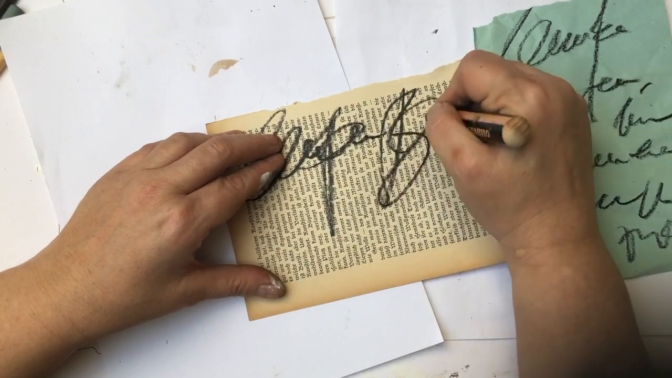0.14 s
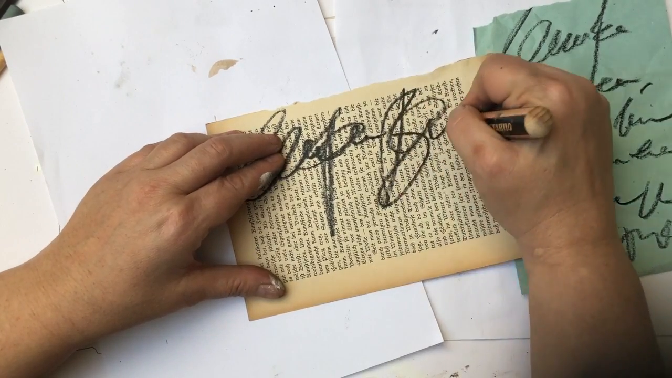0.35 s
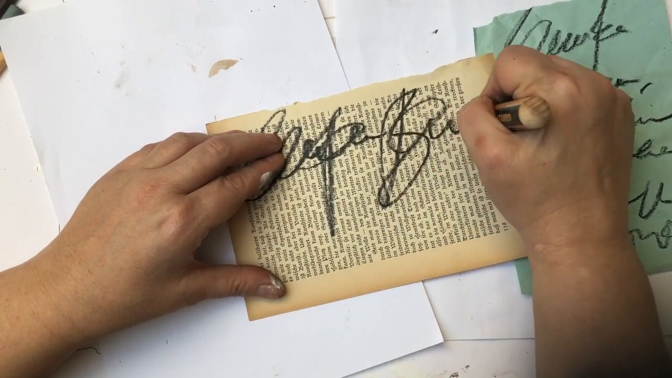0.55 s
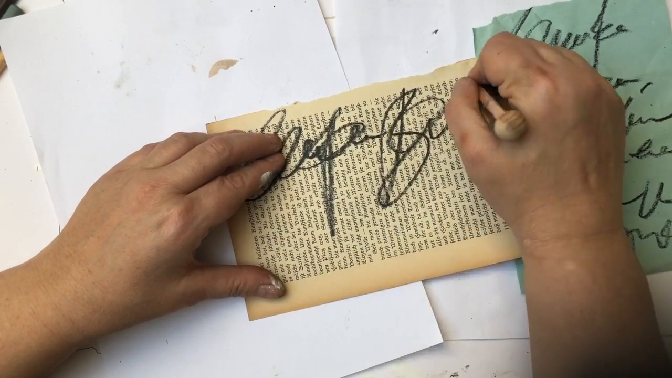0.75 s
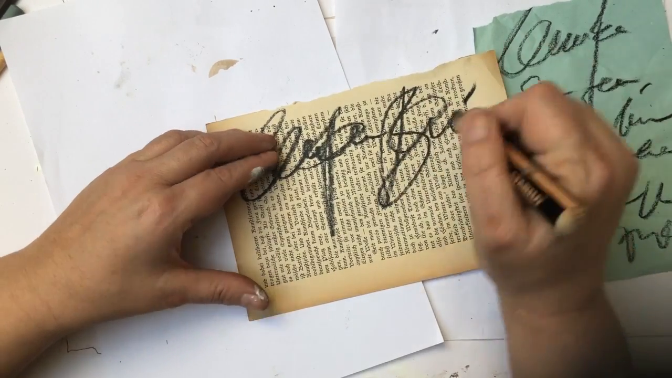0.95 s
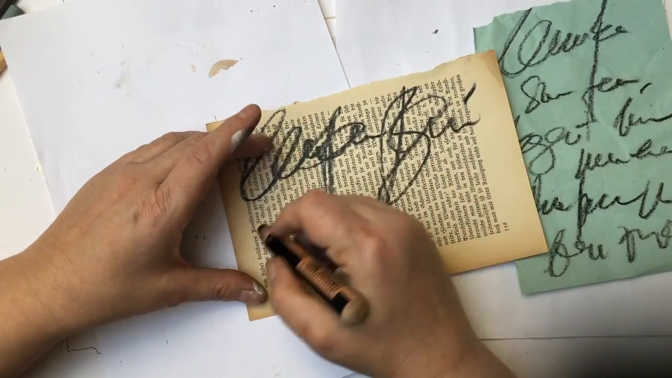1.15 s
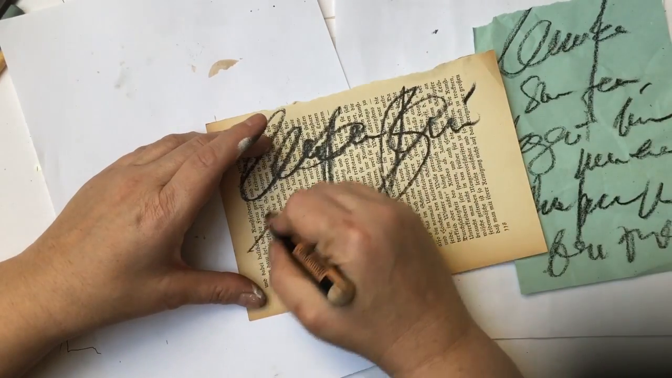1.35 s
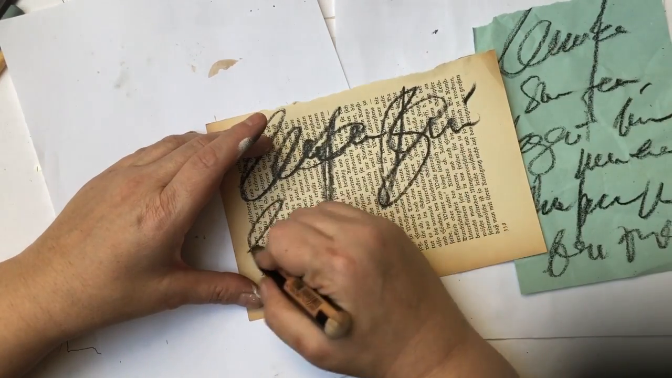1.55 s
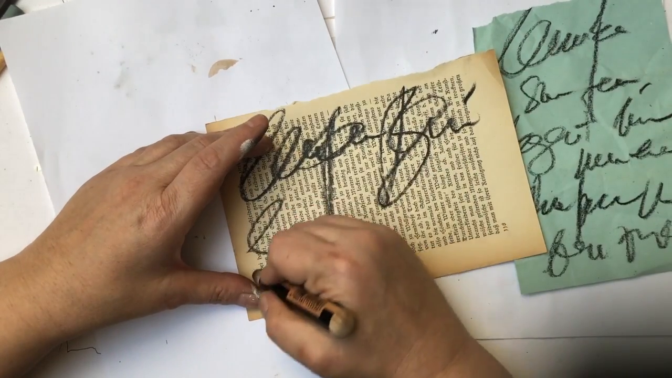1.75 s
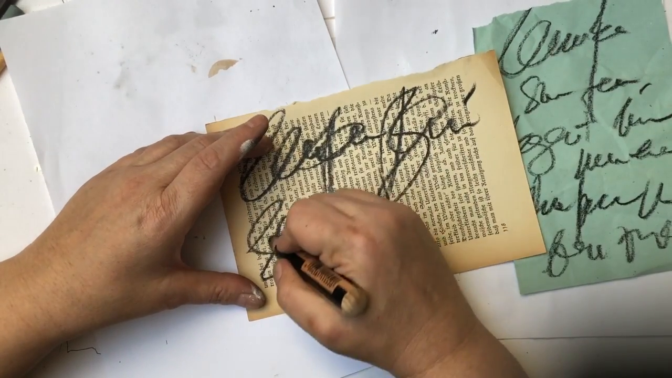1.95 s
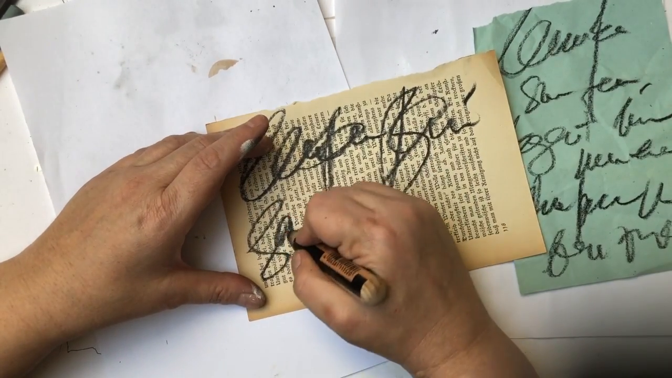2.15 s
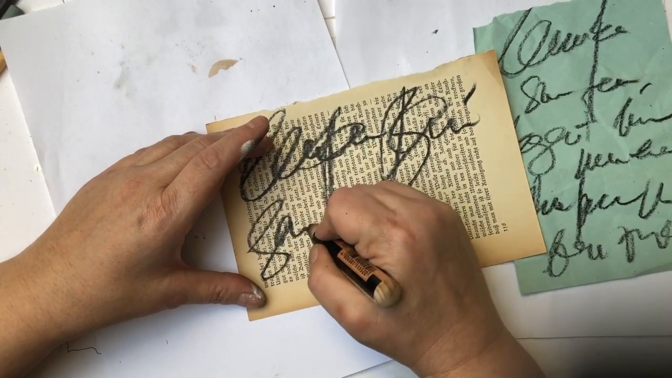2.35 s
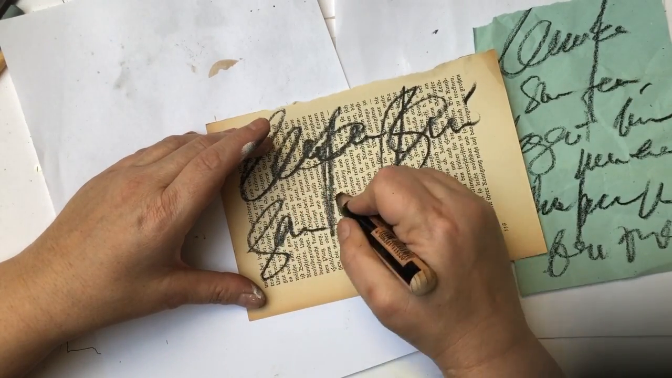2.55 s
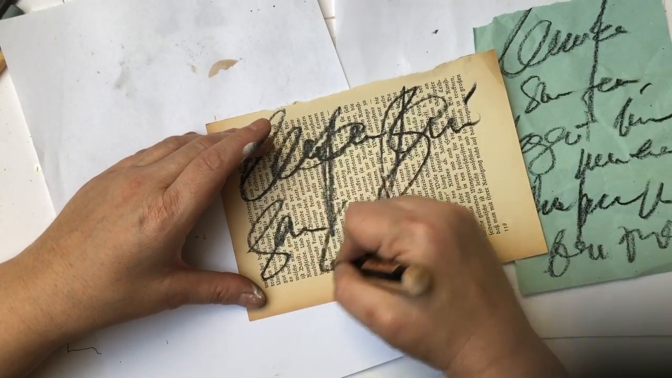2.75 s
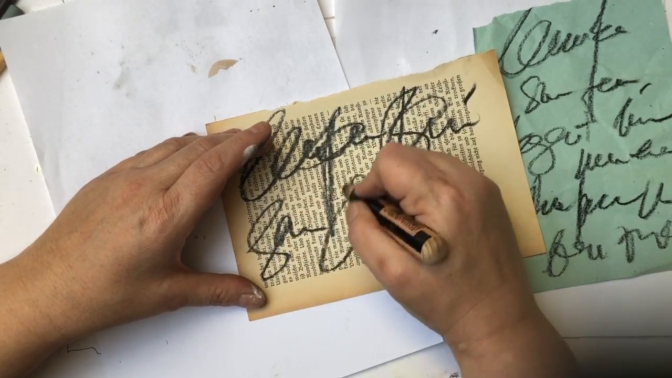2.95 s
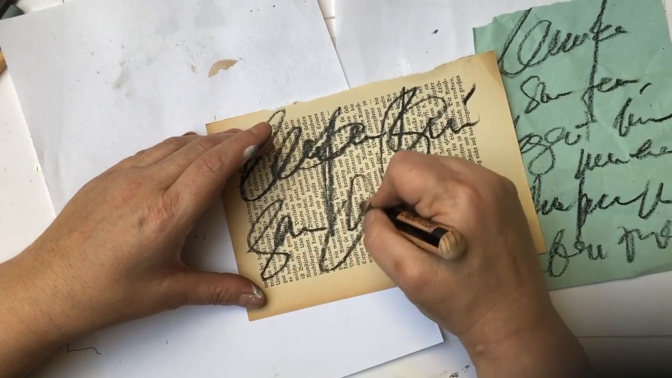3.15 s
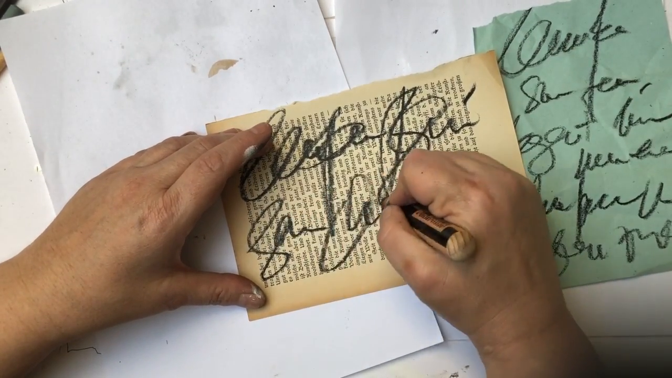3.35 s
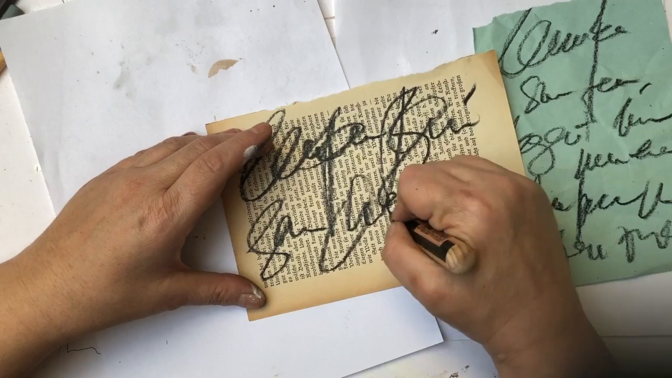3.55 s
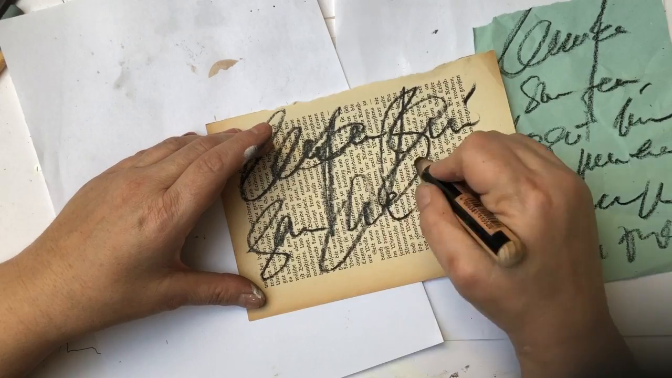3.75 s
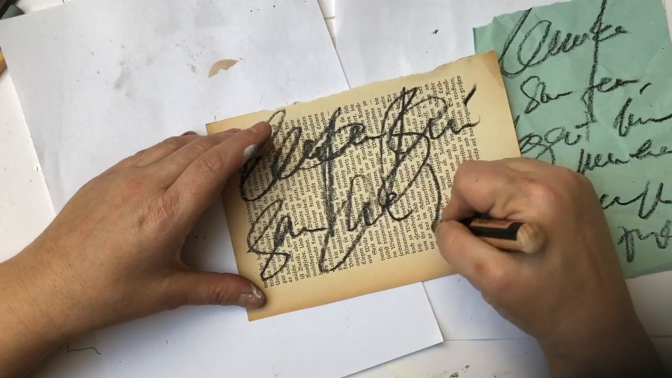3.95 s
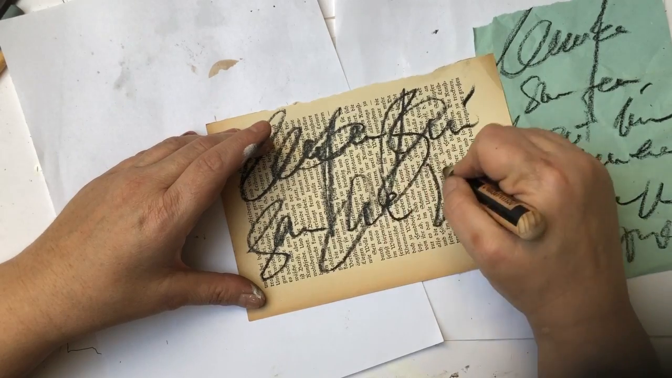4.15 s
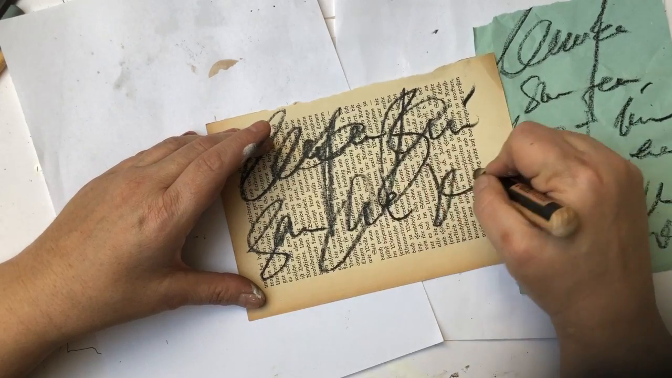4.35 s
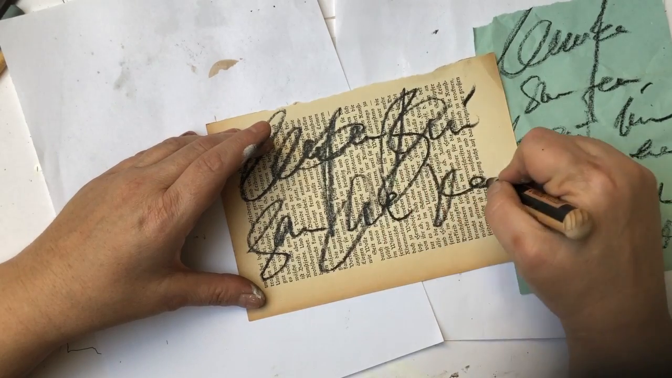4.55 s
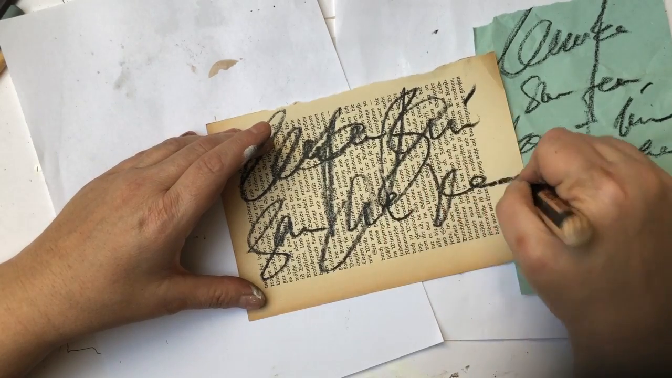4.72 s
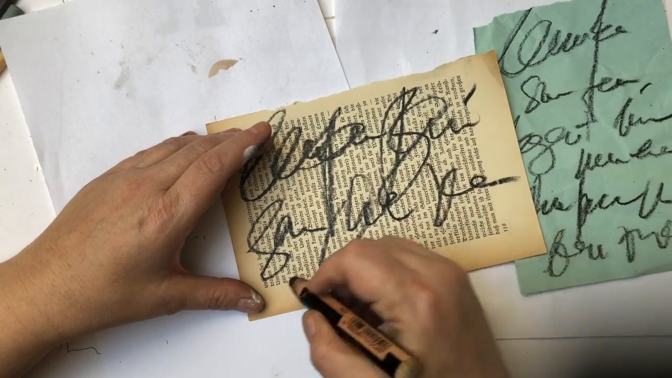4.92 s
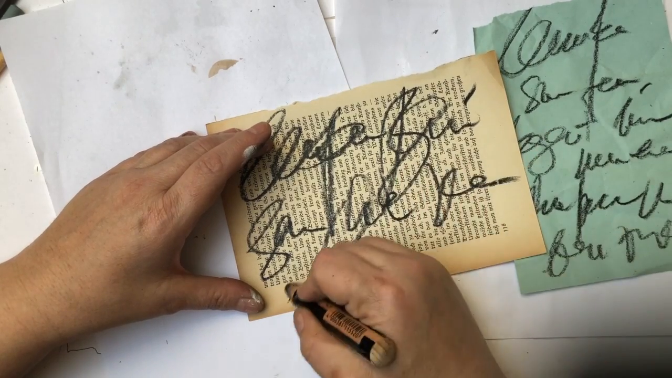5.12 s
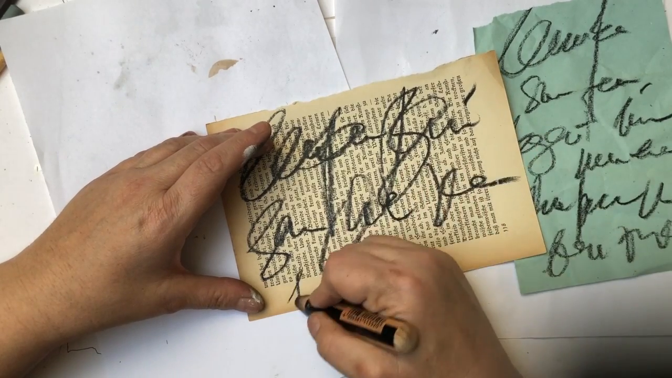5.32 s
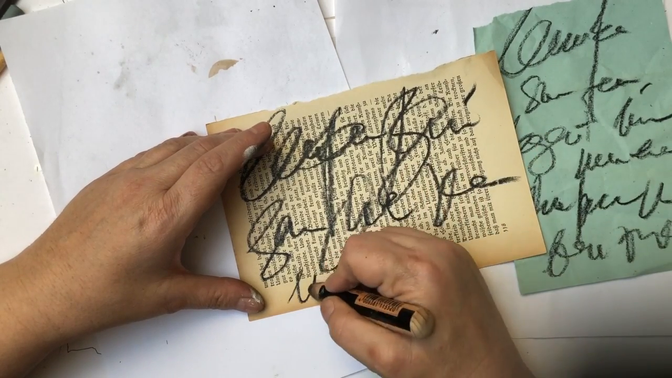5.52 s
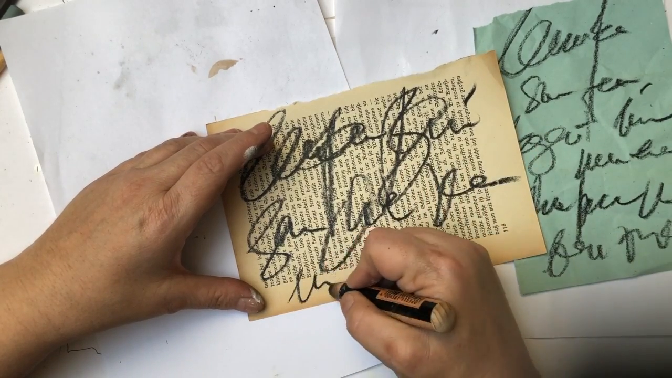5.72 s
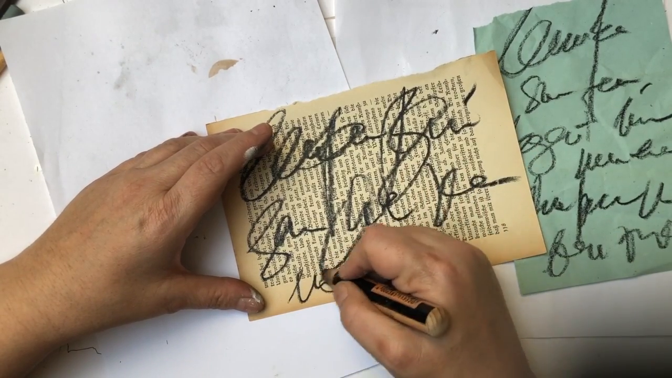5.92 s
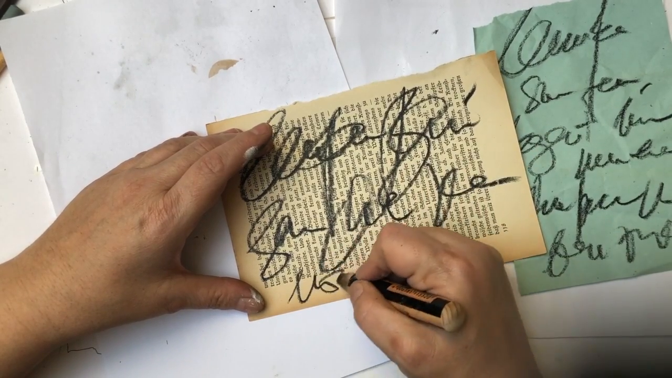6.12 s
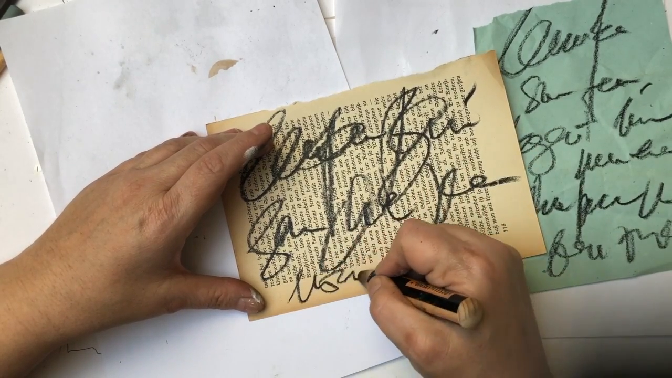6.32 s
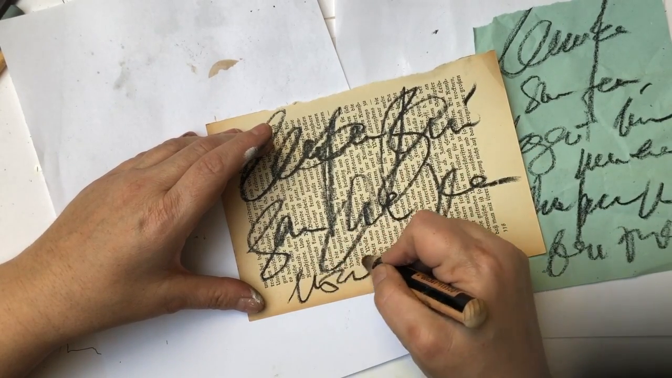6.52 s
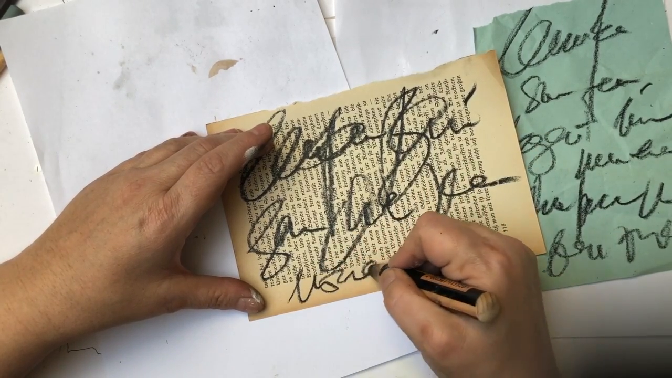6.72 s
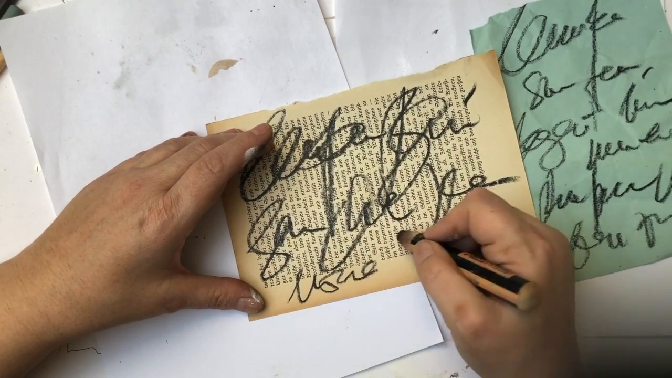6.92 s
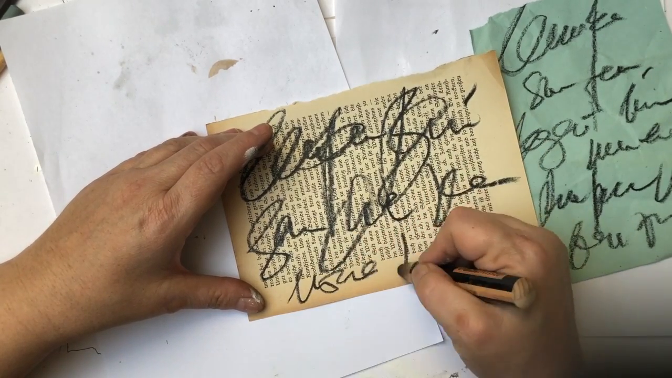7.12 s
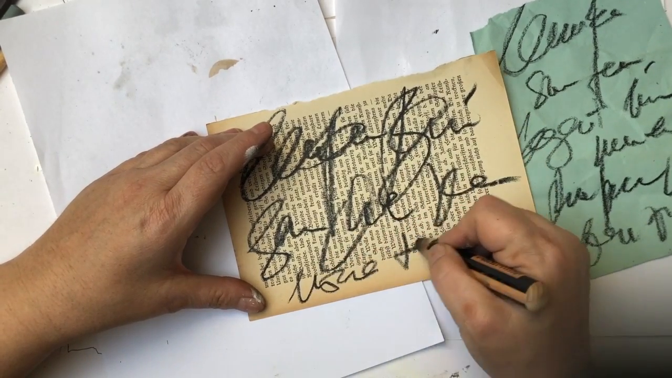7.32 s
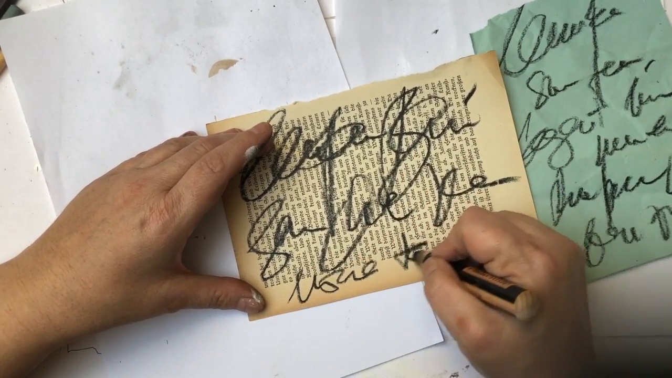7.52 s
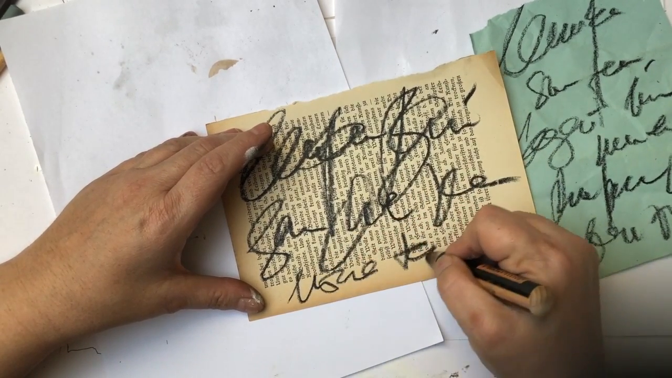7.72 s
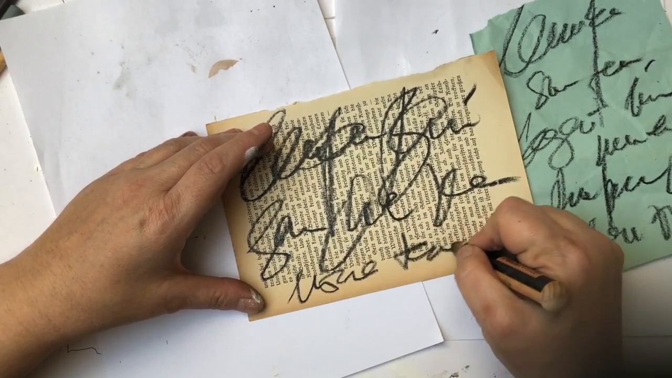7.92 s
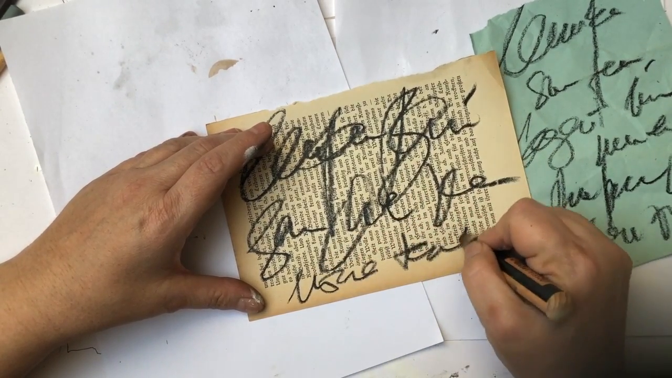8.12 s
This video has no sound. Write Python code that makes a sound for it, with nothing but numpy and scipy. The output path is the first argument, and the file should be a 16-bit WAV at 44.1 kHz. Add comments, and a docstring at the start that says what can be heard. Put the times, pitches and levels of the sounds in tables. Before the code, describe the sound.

Close, dry scratching of a waxy pencil on paper, short swelling strokes broken by brief pauses, tip knocks and faint hand slides in a quiet room.

```python
"""A quiet room: a sheet of paper lies on a table, and a thick wax pencil writes words on it in quick loops, miked close.
Each stroke swells and fades with the tip's speed: the paper's fibres hiss, made of tiny random slips,
and the same kind of slips rumble through the tabletop, more so the harder the hand presses.
At new words the tip ticks on the loose sheet, knocks through it onto the table and digs in before the hand eases.
Between words the side of the hand slides over the page; still air and a short echo lie around it all."""
import sys
import numpy as np
from scipy import signal
from scipy.fft import rfft, irfft, next_fast_len
from scipy.io import wavfile
from scipy.ndimage import uniform_filter1d

SR = 44100
rng = np.random.default_rng(int(sys.argv[2]) if len(sys.argv) > 2 else 0)


def pcm_store(signal):
    """Save signal as 16-bit PCM."""
    levels = np.round(np.clip(np.atleast_2d(signal), -1, 1) * 32767)
    wavfile.write(sys.argv[1], SR, levels.astype(np.int16).T)


N = 360297
TIME = np.arange(N) / SR


def amp(db):
    """Decibels to gain."""
    return 10 ** (np.asarray(db) / 20)


def unit(x):
    """Scales to rms 1."""
    return x / np.sqrt(np.mean(x ** 2) + 1e-20)


def read(points, hz):
    """Reads a table on a log-frequency axis."""
    f, value = np.transpose(points)
    return np.interp(np.log(hz + 1), np.log(f + 1), value)


def over_time(points):
    """Reads a table of (seconds, value) at every sample."""
    return np.interp(TIME, *np.transpose(points))


def add(mix, s, sound):
    """Mixes a sound in at time s."""
    part = mix[round(s * SR):][:len(sound)]
    part += sound[:len(part)]


def colour(x, points):
    """Gives a signal a spectrum, keeping the power of white noise."""
    size = next_fast_len(len(x))
    gain = unit(amp(read(points, np.fft.rfftfreq(size, 1 / SR))))
    return irfft(rfft(x, size) * gain, size)[:len(x)]


def through(x, response):
    """Plays a signal through an impulse response."""
    return signal.oaconvolve(x, response)[:N]


def lowpass(x, order, hz):
    """Butterworth lowpass."""
    return signal.sosfilt(signal.butter(order, hz, fs=SR, output="sos"), x)


def resonate(x, hz, width):
    """One resonance of gain 1, width in Hz."""
    return signal.lfilter(*signal.iirpeak(hz, hz / width, fs=SR), x)


def wander(hz):
    """Slow chance of rms 1, up to the given rate."""
    return unit(lowpass(rng.standard_normal(N), 2, hz))


# The still air of the room at the microphone.
# Each row: frequency in Hz, spectrum in dB per Hz (shape only).
AIR_SPECTRUM = [(15, -25), (28, -11), (45, 2.5), (65, 4.5), (110, 0.5), (140, -9), (230, -5.5),
                (330, -12.5), (800, -18.5), (2000, -31), (6000, -29.5), (10000, -36.5), (16000, -35.5)]
AIR_DB = -60.5  # rms of the air before the recorder's filters


def still_air():
    """Steady noise, coloured like the air of a quiet room."""
    return amp(AIR_DB) * colour(rng.standard_normal(N), AIR_SPECTRUM)


# How long the room holds each band.
# Each row: frequency in Hz, time to fall by 60 dB in seconds.
ROOM_DECAY = [(100, 0.13), (260, 0.15), (700, 0.26), (1800, 0.25), (5000, 0.1)]


def room(x, first_s=.008, size=20):
    """Sparse reflections of random sign, each band dying at its own speed."""
    taps = np.zeros(SR // 2)
    at = np.arange(0, len(taps) - size, size)
    taps[at + rng.integers(0, size, len(at))] = rng.choice([-1, 1], len(at))
    hz, t, z = signal.stft(taps, SR, nperseg=256)
    decay = amp(-60 * t / read(ROOM_DECAY, hz)[:, None])
    tail = signal.istft(z * decay, SR, nperseg=256)[1]
    return through(x, np.r_[np.zeros(round(first_s * SR)), tail / np.linalg.norm(tail)])


# A faint, rough ringing lingers as the pencil flicks off the page.
# Each row: frequency in Hz, width in Hz, level in dB, time to fall by 60 dB in seconds.
LIFT_BANDS = [(1330, 96, -65.5, 0.99), (1900, 1200, -70.5, 1)]
LIFT_S = 4.737  # when the pencil flicks off


def lift_ring():
    """Narrow bands of noise that die slowly."""
    t = np.maximum(TIME - LIFT_S, 0)
    out = np.zeros(N)
    for hz, width, db, t60 in LIFT_BANDS:
        band = resonate(resonate(rng.standard_normal(N), hz, width), hz, width)
        out += amp(db - 60 * t / t60) * unit(band)
    return out * (t > 0)


def speed(start, end, fastest):
    """One movement speeds up from rest and slows down again; gives its samples and its speed, 0-1."""
    span = slice(*np.searchsorted(TIME, [start, end]))
    peak = start + np.clip(fastest, 0, 1) * (end - start)
    return span, np.sin(np.pi / 2 * np.interp(TIME[span], [start, peak, end], [0, 1, 0]))


# The side of the hand slides over the page.
# Each row: start in seconds, end in seconds, paper hiss in dB (relative).
HAND_SLIDES = [(0.57, 0.693, -64.5), (0.786, 1.055, -60.5), (0.933, 1.323, -63.5), (2.536, 2.626, -60.5),
               (4.755, 4.916, -64), (6.748, 6.908, -51), (6.883, 6.952, -62.5)]


def slide_level(fastest=0.61):
    """The sliding hand makes the paper hiss in step with its speed, without shaking the table."""
    level = np.zeros(N)
    for start, end, db in HAND_SLIDES:
        span, v = speed(start, end, fastest)
        level[span] = np.hypot(level[span], amp(db) * v)
    return level


# Moments when the tip leaves the paper, in seconds.
TIP_LIFTS = [0.161, 0.32, 0.587, 0.833, 2.49, 3.153, 3.69, 4.097, 4.54, 4.742, 6.697, 7.815, 8.082, 8.215]
HOP_S = .075  # longest lift that counts as a short hop


def hopped(start):
    """Whether the tip comes down from a short hop at this time."""
    return any(0 < start - s < HOP_S for s in TIP_LIFTS)


def snap(db, hz, length, width_hz=1900, pitched_db=1, size=1024):
    """The loose sheet snaps in a faintly pitched burst that dies within milliseconds."""
    noise, t = rng.standard_normal(size), np.arange(size) / SR
    pitched = unit(resonate(resonate(noise, hz, width_hz), hz, width_hz))
    burst = (colour(noise, FIBRE_SPECTRUM) + amp(pitched_db) * pitched) * np.exp(-t / length)
    return amp(db) * burst / np.linalg.norm(burst)


# The tip catches the loose sheet, mostly just before a knock.
# Each row: time in seconds, strength in dB (relative), pitch of the snap in Hz.
SHEET_TICKS = [(0.623, -32, 4030), (0.916, -30, 6000), (0.972, -34, 5500), (1.249, -27, 5800),
               (2.589, -28, 4500), (3.814, -18.5, 4200), (4.734, -27.5, 2620), (5.0429, -27.5, 5560),
               (6.746, -40, 3500), (6.958, -25, 3550)]
TICK_S = 0.0017  # decay time
# crack: dB against a knock of this hardness, pitch, decay time
CRACK_DB, CRACK_HARDNESS_HZ, CRACK_HZ, CRACK_S = -25, 1210, 2920, 0.0038
# scuff: dB against its stroke, delay, pitch, decay time
SCUFF_DB, SCUFF_AFTER_S, SCUFF_HZ, SCUFF_S = 18.5, .011, 4200, 0.008


def ticks():
    """The sheet snaps where the tip catches it, cracks under hard knocks and scuffs after each hop."""
    out = np.zeros(N)
    for s, db, hz in SHEET_TICKS:
        add(out, s, snap(db, hz, TICK_S))
    for s, db, hard_hz, _ in TIP_KNOCKS:
        hardness = (hard_hz / CRACK_HARDNESS_HZ) ** 2
        add(out, s, hardness * snap(db + CRACK_DB, CRACK_HZ, CRACK_S))
    for start, db in TIP_STROKES:
        if hopped(start):
            add(out, start + SCUFF_AFTER_S, snap(db + SCUFF_DB, SCUFF_HZ, SCUFF_S))
    return out


# The bending wave that crosses the tabletop. Each row: frequency in Hz, gain in dB (shape only).
TABLE_WAVE = [(30, -43), (60, -7), (105, -7), (140, -21), (190, -1), (370, 0), (440, -5.5), (520, -0.5),
              (800, 0), (950, 1), (1350, -3.5), (1900, -11.5), (3000, -13), (5000, -38.5)]
# The tabletop's ringing modes.
# Each row: frequency in Hz, level in dB against the wave, time to fall by 60 dB in seconds.
TABLE_MODES = [(103.4, -44.5, 0.33), (177.5, -44, 0.35), (226, -50, 0.12), (391, -36.5, 0.12),
               (464, -46.5, 0.16), (577, -38.5, 0.13), (661, -42.5, 0.18), (832.5, -30.5, 0.083),
               (1061, -37, 0.074), (1369, -40, 0.12), (1595, -49, 0.18), (1705, -48, 0.21)]


def tabletop(crossing_s, size=16384):
    """The table's answer to a blow, in two parts: a bending wave whose treble arrives first, and its ringing modes."""
    hz, t = abs(np.fft.fftfreq(size, 1 / SR)), np.arange(size) / SR
    half = size // 2 + 1
    # minimum phase: the response starts at the blow
    log_gain = np.log(amp(read(TABLE_WAVE, hz)))
    causal = np.exp(np.conj(signal.hilbert(log_gain)))[:half]
    # the delay falls as 1 / sqrt(Hz) and is crossing_s at 1 kHz
    turns = 2 * crossing_s * np.sqrt(hz[:half] * 1000)
    wave = irfft(causal * np.exp(-2j * np.pi * turns))
    wave /= np.linalg.norm(wave)
    ring = 0
    for mode_hz, db, t60 in TABLE_MODES:
        turn = np.exp(2j * np.pi * mode_hz * t)
        in_step = np.exp(1j * np.angle(np.sum(wave / turn)))  # each mode rings on from the wave that feeds it
        ring = ring + amp(db - 60 * t / t60) * (turn * in_step).real
    return wave, ring * (1 - np.exp(-(t / crossing_s) ** 2))


# The tip lands on the table or bumps down as it turns.
# Each row: time in seconds, strength in dB (relative), hardness of the contact in Hz,
# ring of the pencil's shaft in dB (relative).
TIP_KNOCKS = [(0.6634, 7, 874, -10), (1.254, .5, 1210, -9), (2.449, -16, 330, -10), (2.592, 5.5, 1360, 1),
              (3.3996, -6, 530, -12), (3.590, -18, 445, -11), (3.8215, 5.5, 1330, 1),
              (5.0451, 0.5, 1150, -7), (5.755, -20, 980, -10), (5.83, -20.5, 300, -10),
              (6.9713, -3.5, 725, -4.5), (7.3101, -13.5, 895, 0.5), (7.442, -13.5, 250, -10),
              (7.528, -19, 430, -13), (7.867, -21, 350, -12)]
# The table's edge sends a knock back; it is nearer on the last line of writing.
# Each row: time in seconds, lag in seconds.
EDGE_LAG = [(0, 0.0021), (2.6, 0.0021), (5, .0023), (7, 0.0015)]


def knocks(wave, ring, echo_db=-8, shaft_db=-21, shaft_hz=900, shaft_t60=0.04, size=512):
    """Each landing is a short push, brighter when the contact is hard; the pencil's shaft rings briefly."""
    pushes, echoes, to_shaft = np.zeros((3, N))
    for s, db, hard_hz, ring_db in TIP_KNOCKS:
        push = amp(db) * lowpass(signal.unit_impulse(size), 3, hard_hz)
        lag = np.interp(s, *np.transpose(EDGE_LAG))
        add(pushes, s, push)
        add(echoes, s + lag, -amp(echo_db) * push)  # the wave comes back upside down
        add(to_shaft, s, amp(ring_db) * push)
    t = TIME[:len(ring)]
    shaft = amp(shaft_db - 60 * t / shaft_t60) * np.cos(2 * np.pi * shaft_hz * t)
    return through(pushes + echoes, wave) + through(pushes, ring) + through(to_shaft, shaft)


# How hard the hand presses.
# Each row: time in seconds, tabletop rumble over paper hiss in dB (before digs).
HAND_PRESSURE = [(0.0, 7), (0.45, 0.5), (0.75, 11), (1.5, 1), (1.85, 4.5), (2.3, -4.5), (2.68, 2),
                 (3.0, 3.5), (3.27, -2.5), (3.6, -1), (4.05, 4), (4.18, -1.5), (4.3, 4.5), (4.46, -6),
                 (4.7, 8.5), (5.35, -1.5), (5.65, -7.5), (5.83, 1.5), (6.0, -4.5), (6.3, -9), (7.05, 1),
                 (7.3, -7.5), (7.44, -3), (7.6, -10), (8.15, -4)]
DIG_DB, EASE_S = 6, 0.33  # a landing of 0 dB digs in by this much, then the hand eases off


def pressure():
    """The hand's weight in dB over time: a slow drift, and a dig after each landing that eases off."""
    weight = over_time(HAND_PRESSURE)
    for s, db, _, _ in TIP_KNOCKS:
        easing = np.exp(-abs(TIME - s) / EASE_S) * (TIME > s)
        weight += DIG_DB * np.sqrt(amp(db)) * easing
    return weight


# Each stroke lasts until the tip turns into the next one or leaves the paper.
# Each row: start in seconds, paper hiss in dB (relative).
TIP_STROKES = [(-0.053, -56.5), (0.048, -59.5), (0.168, -60.0), (0.242, -60.5), (0.34, -62), (0.44, -70),
               (0.679, -65), (1.283, -58), (1.44, -54), (1.55, -55.5), (1.653, -57), (1.77, -53.0),
               (1.889, -55.5), (1.999, -56.5), (2.095, -58.5), (2.189, -59.5), (2.288, -62), (2.395, -59.5),
               (2.631, -49), (2.727, -51.0), (2.935, -52), (3.046, -55.5), (3.159, -54), (3.222, -56.5),
               (3.303, -61), (3.446, -57.5), (3.834, -54), (3.974, -54), (4.154, -55.5), (4.227, -57),
               (4.39, -60.5), (4.634, -59.5), (5.061, -61.5), (5.227, -58.0), (5.329, -55), (5.446, -63),
               (5.542, -60), (5.758, -61), (5.893, -57.5), (6.008, -62), (6.088, -59), (6.212, -60.5),
               (6.415, -62), (6.514, -56), (6.593, -58), (7.012, -56), (7.128, -57), (7.234, -54),
               (7.388, -56.5), (7.491, -53.5), (7.612, -55.5), (7.705, -56), (7.855, -60), (8.001, -55.5),
               (8.101, -54.5)]
# The tip rounds its turns, so strokes overlap a little; the last line has sharper corners.
# Each row: time in seconds, overlap in seconds.
TURN_OVERLAP = [(1.9, 0.0074), (2.3, 0.0082), (2.7, 0.0094), (5.5, 0.0033)]
# share of a stroke at which the tip is fastest; after a short hop it comes down already moving
FASTEST, FASTEST_AFTER_HOP = 0.55, .2
# hiss and rumble grow as these powers of speed: the table shakes most in mid-stroke
HISS_POWER, RUMBLE_POWER = 0.85, 1.49


def stroke_levels():
    """Stroke follows stroke; gives the strength of hiss and of rumble over time."""
    hiss, rumble = np.zeros((2, N))
    breaks = sorted([start for start, _ in TIP_STROKES] + list(TIP_LIFTS))
    for start, db in TIP_STROKES:
        end = next(s for s in breaks if s > start)
        rounding = np.interp(start, *np.transpose(TURN_OVERLAP))
        early, fastest = (0, FASTEST_AFTER_HOP) if hopped(start) else (rounding, FASTEST)
        late = rounding * (end not in TIP_LIFTS)
        span, v = speed(start - early, end + late, fastest)
        hiss[span] += (amp(db) * v ** HISS_POWER) ** 2
        rumble[span] += (amp(db) * v ** RUMBLE_POWER) ** 2
    return np.sqrt(hiss), np.sqrt(rumble) * amp(pressure())


TOOTH_PER_S = 9000  # slips per second


def fibres(spread_db):
    """Tiny slips of the tip over the paper's tooth, a few much larger than the rest."""
    size = amp(spread_db * np.minimum(rng.exponential(1, N), 5))
    return unit(size * rng.choice([-1, 1], N) * (rng.random(N) < TOOTH_PER_S / SR))


# Jolts of the sliding tip on the table.
# Each row: frequency in Hz, spectrum in dB per Hz (shape only).
DRAG_SPECTRUM = [(50, -7), (105, 6), (200, 8), (350, -1), (800, -1.5), (1300, -6), (2000, -7), (3500, -3.5)]


def table_rumble(level, table, spread_db=4):
    """The same kind of slips shake the tabletop."""
    jolts = colour(fibres(spread_db), DRAG_SPECTRUM)
    return through(jolts * level, table) / np.std(through(jolts, table))


# Where the sheet lies slack, the rubbing sings in one resonance.
# Each row: start in seconds, end in seconds, frequency in Hz, width in Hz, level in dB against the hiss.
SLACK_PARTS = [(0, 0.66, 1670, 140, -10), (1.3, 2.063, 1890, 250, -11.5), (2.7, 2.945, 920, 119, -14),
               (4.14, 4.55, 1070, 110, -3.5), (4.1, 4.73, 2840, 260, -6.5), (7.5, 8.068, 1016, 100, -11.5)]


def slack_sheet(level, spread_db=3):
    """Slips of the tip ring the loose parts of the sheet."""
    slips, out = fibres(spread_db), np.zeros(N)
    for start, end, hz, width, db in SLACK_PARTS:
        rubbed = slips * level * ((TIME > start) & (TIME < end))
        out += amp(db) * resonate(rubbed, hz, width) / np.sqrt(np.pi * width / SR)
    return out


def crumbs(level, per_s=70):
    """Crumbs of wax break off at random with equal tiny clicks, scaled by the hiss level."""
    clicks = unit((rng.random(N) < per_s / SR).astype(float))
    return level * colour(clicks, FIBRE_SPECTRUM)


# Fibres flicking off the tip. Each row: frequency in Hz, spectrum in dB per Hz (shape only).
FIBRE_SPECTRUM = [(300, -37), (1200, -10.5), (2100, -13), (2700, -10.5), (3500, -3), (4500, -5),
                  (5800, -1.5), (7000, -3), (8000, -11), (9300, -18.5), (12000, -23.5), (15500, -19)]
# What a fast stroke adds to that colour. Each row: frequency in Hz, change in dB for each 10 dB of hiss.
FAST_STROKE_COLOUR = [(1500, -4), (3500, 1), (6000, 3.5), (9000, 3), (15000, 5)]
# Keenness of the tip's edge as the pencil turns in the hand.
# Each row: time in seconds, extra treble in dB.
EDGE_KEENNESS = [(0, -1), (.5, 0.5), (.9, 5), (1.5, 0.5), (2.4, -1), (3, -7), (4.3, -4), (4.9, -1.5),
                 (5.6, 2.5), (6.7, 1), (7.3, -2), (8.1, -8.5)]


def paper_hiss(level, spread_db=3, patchy_db=2, usual_db=-58, keen_hz=8000):
    """Fibres hiss, brighter when the tip is fast or keen; the colour shifts as the tip moves over the sheet."""
    rubbing = colour(fibres(spread_db), FIBRE_SPECTRUM) * level
    hz, t, z = signal.stft(rubbing, SR, nperseg=256)
    level_db = 20 * np.log10(np.interp(t, TIME, level) + 1e-9)
    effort = np.clip(level_db - usual_db, -20, 20) / 10
    # random patches, smoothed over frequency and then over time
    patches = uniform_filter1d(rng.standard_normal(z.shape), size=2, axis=0)
    patches = unit(uniform_filter1d(patches, size=36, axis=1))
    edge = np.minimum(hz / keen_hz, 1)[:, None] ** 2 * np.interp(t, *np.transpose(EDGE_KEENNESS))
    brightness = read(FAST_STROKE_COLOUR, hz)[:, None] * effort
    z = z * amp(brightness + edge + patchy_db * patches)
    return signal.istft(z, SR, nperseg=256)[1][:N]


def scene(hiss_db=0.18, rumble_db=-0.12, knock_db=-1, tick_db=1.0, crumb_db=-14,
          grip_db=0.62, grip_hz=40, lumpy_db=2.5, lumpy_hz=30, table_room_db=-13, paper_room_db=-15):
    """Strokes, slides, knocks and ticks over the quiet of the room."""
    wave, ring = tabletop(crossing_s=.0028)
    tip, rumble = stroke_levels()
    hiss = np.hypot(tip, slide_level())
    grip = amp(grip_db * wander(grip_hz))  # the wax catches and lets go
    lumps = amp(lumpy_db * wander(lumpy_hz))  # the tip rides over print and older lines
    paper = amp(hiss_db) * paper_hiss(hiss * grip) + slack_sheet(hiss * grip)
    paper += amp(crumb_db) * crumbs(hiss) + amp(tick_db) * ticks()
    wood = amp(rumble_db) * table_rumble(rumble * grip * lumps, wave + ring)
    wood += amp(knock_db) * knocks(wave, ring)
    echo = room(amp(table_room_db) * wood + amp(paper_room_db) * paper)
    return (paper + wood + lift_ring() + echo + still_air())[None]


EDGE_HZ = 15800  # upper band limit


def record(dry, rumble_cut_hz=32):
    """The recorder's bass cut and band limit."""
    lean = signal.sosfilt(signal.butter(3, rumble_cut_hz, "high", fs=SR, output="sos"), dry)
    band_limit = signal.firwin(511, EDGE_HZ, window=("kaiser", 9), fs=SR)
    return signal.oaconvolve(lean, band_limit[None], "same")


dry = scene()
out = record(dry)
pcm_store(out)
```